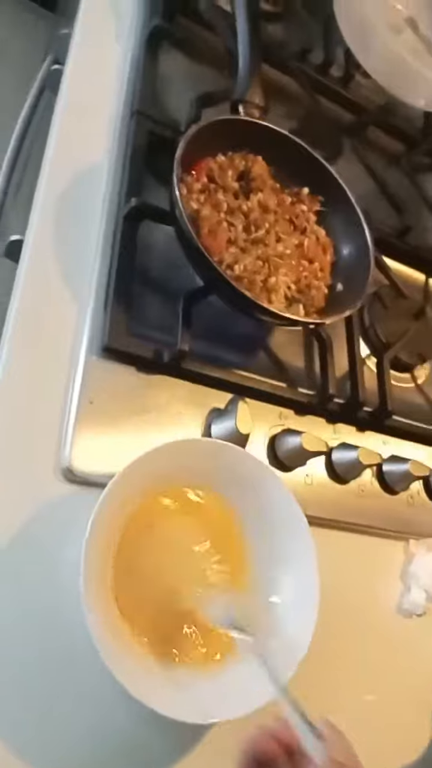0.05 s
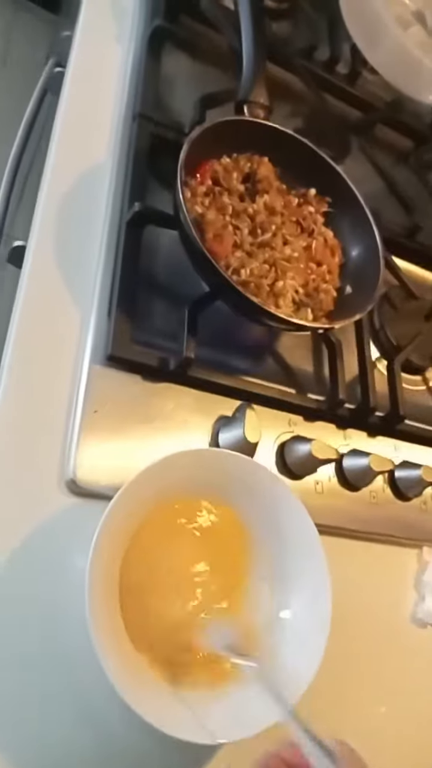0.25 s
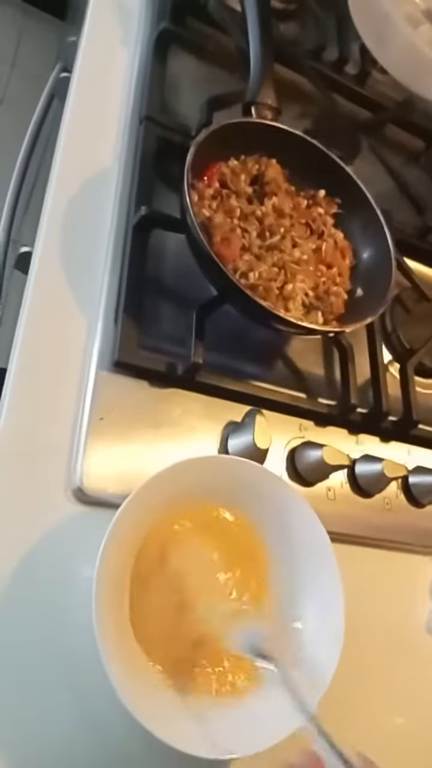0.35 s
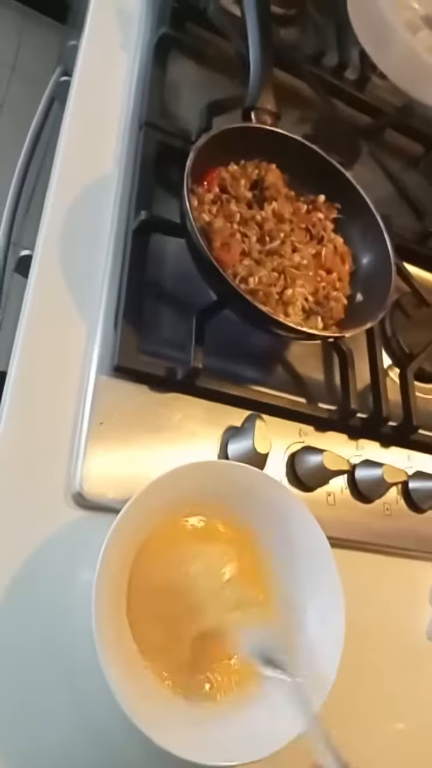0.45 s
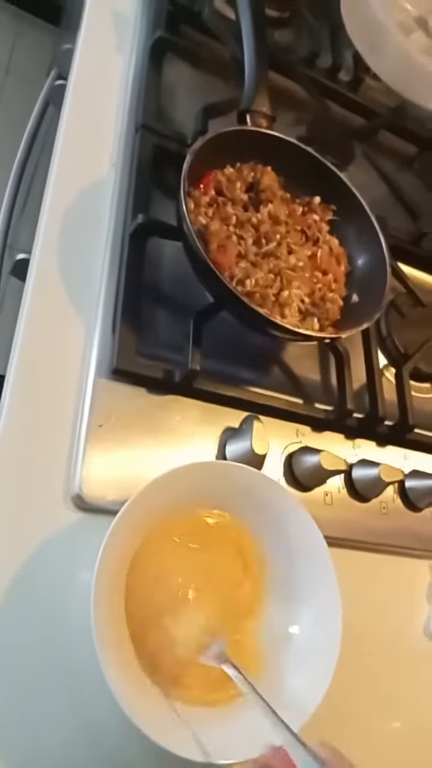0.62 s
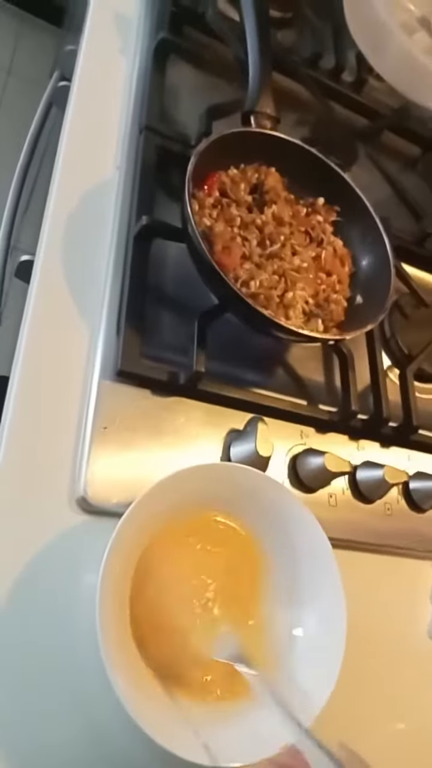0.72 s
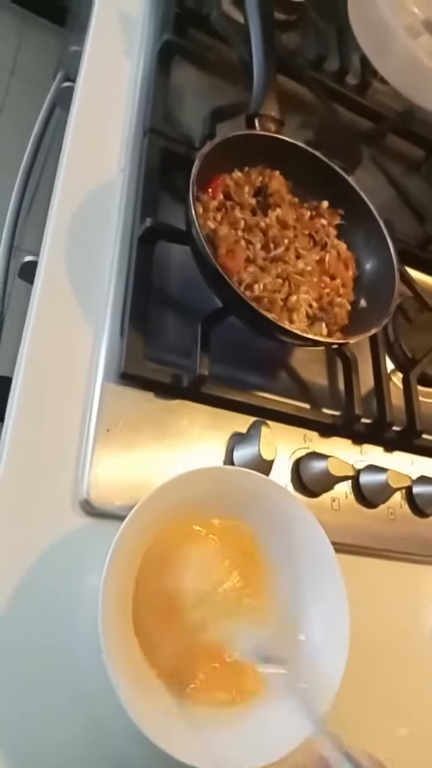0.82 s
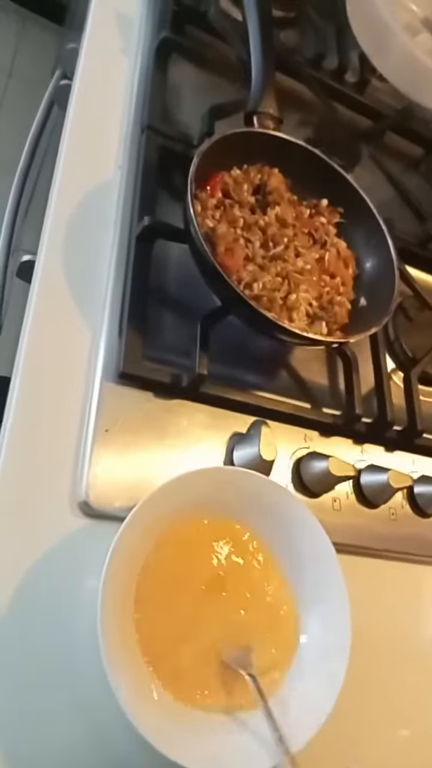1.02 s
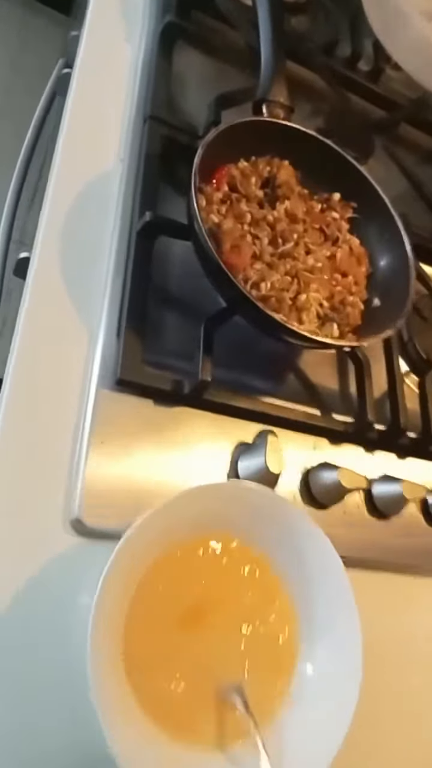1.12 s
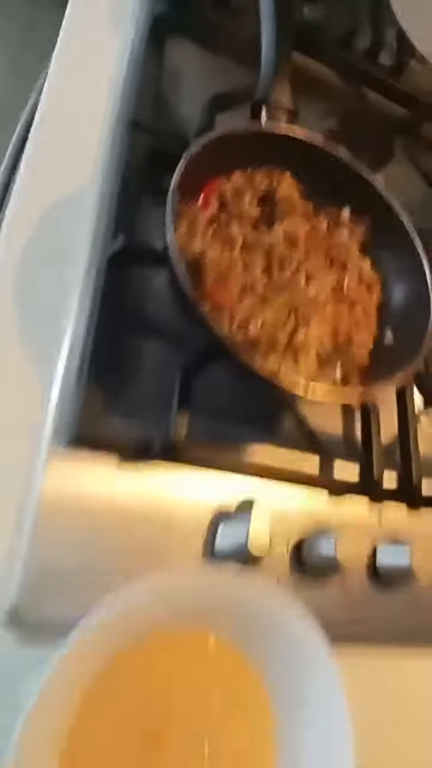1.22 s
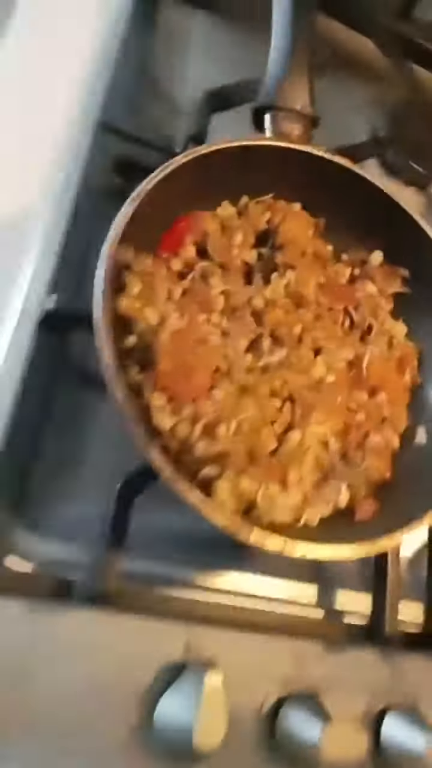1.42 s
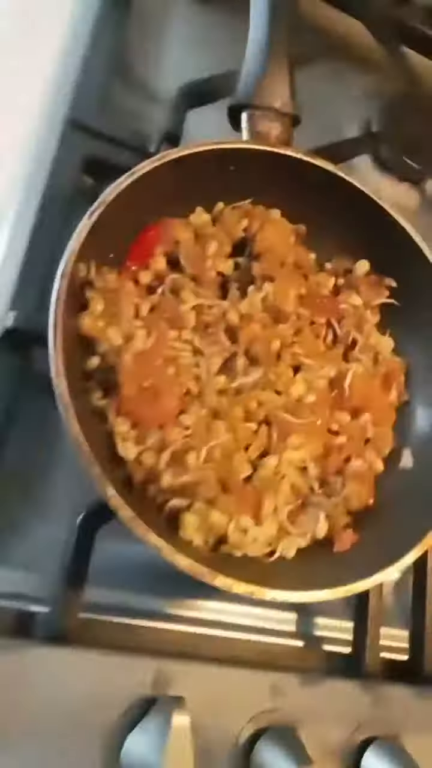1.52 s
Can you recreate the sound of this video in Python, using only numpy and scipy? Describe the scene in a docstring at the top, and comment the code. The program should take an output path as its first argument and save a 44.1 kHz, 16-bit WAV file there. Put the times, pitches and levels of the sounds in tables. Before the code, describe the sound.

Rapid fork clicks and wet sloshing of beaten eggs, ending in one bright clink.

```python
"""Beating eggs in a small kitchen

Close up, a fork beats eggs in a hand-held ceramic bowl, about ten strokes a second. Each stroke clicks
on the egg-damped wall and thumps the bowl, and the lifted egg sloshes back. Then the fork is dropped
against the rim and clinks. A frying pan sizzles faintly behind. One microphone, mono."""
import sys
import numpy as np
from scipy import signal
from scipy.fft import rfft, irfft
from scipy.io import wavfile

SR = 44100
rng = np.random.default_rng(int(sys.argv[2]) if len(sys.argv) > 2 else 0)


def to_wav(sig):
    """Store sig (one row per channel, or 1-D mono) as 16-bit WAV at the path in sys.argv[1].

    Samples outside -1..1 are clipped; the rate is SR.
    """
    pcm = np.clip(np.atleast_2d(sig), -1, 1) * 32767
    pcm = np.round(pcm).astype(np.int16)
    wavfile.write(sys.argv[1], SR, pcm.T)  # frames by channels


N = 68355
t = np.arange(N) / SR
age = t[:SR // 3]  # seconds since the start of one short sound

# low background of the kitchen: freq_hz, gain_db
ROOM_TONE_SPECTRUM = [(25, -30), (60, -2.5), (120, 1), (200, -13), (320, -8), (600, -19), (1200, -22.5),
                      (3000, -67)]
# frying hiss: freq_hz, gain_db
SIZZLE_SPECTRUM = [(1000, -11), (2100, -1), (3000, -5.5), (4300, -5), (7500, -20), (9800, -15.5),
                   (12800, -21.5), (13400, -57)]
# a soft knock, then a few faint ticks over the sizzle: start_s, level_db, pitch_hz
KNOCK_AND_TICKS = [(1.2483, -41.5, 1620), (1.2935, -48.5, 3600), (1.3522, -49.5, 4440), (1.424, -50, 4300)]
# churning egg: freq_hz, gain_db
SWIRL_SPECTRUM = [(30, -37), (115, 12.5), (220, -2), (700, -1), (1100, -11), (1700, -30), (3000, -27),
                  (7000, -26), (9800, -14.5), (13400, -40)]
# egg falling back: start_s, length_s, level_db
EGG_SLOSHES = [(.008, .025, -41.5), (0.103, .022, -32), (0.202, .036, -25.5), (0.293, .018, -32),
               (0.396, .025, -47), (0.485, 0.018, -39.5), (0.594, 0.013, -40.5), (.694, .026, -31.5),
               (0.786, 0.037, -31.5), (0.88, 0.029, -28), (0.984, 0.035, -44.5)]
# its wet splash: freq_hz, gain_db
SPLASH_SPECTRUM = [(100, -21), (400, -12), (700, 9), (1100, -7), (1700, 0), (2800, -31.5), (5000, -25),
                   (7500, -30), (9600, -23.5), (13000, -46)]
# fine droplets: freq_hz, gain_db
SPRAY_SPECTRUM = [(800, 2), (2200, 1.5), (4500, 6), (7300, -5.5), (9700, -1), (13500, -9)]
# tines rubbing the glaze: start_s, length_s, level_db, pitch_hz
GLAZE_RUBS = [(.177, 0.023, -32, 1795), (0.539, 0.032, -41.5, 9900), (0.746, 0.059, -41, 9360)]
# fork bouncing on the rim: start_s, ring_db, clatter_db
RIM_BOUNCES = [(1.1175, -11, -27), (1.1226, -10.5, -18), (1.1375, -50, -26), (1.167, -31.5, -32),
               (1.1800, -52, -31.5)]
# bare rim and fork: pitch_hz, gain_db, t60_s
BARE_RIM_MODES = [(770, -12, .13), (1800, -12, .06), (3178, -6, .08), (3232, 1, .125), (3303, -1, .055),
                  (3421, -6, .045), (3544, -9, .045), (4560, -11, .04), (4908, -8, .055), (4967, -6, .13),
                  (6843, -12, .08), (6935, -12, .06), (9372, -11, .06), (11542, -16, .10)]
# rattle of the dropped fork: freq_hz, gain_db
CLATTER_SPECTRUM = [(60, -1.5), (130, 3), (250, -3.5), (700, 3), (1200, 0.5), (2000, 3), (2600, -8),
                    (4700, -1.5), (5900, -27), (7800, -13), (9200, 2), (10600, -11), (12500, -7),
                    (14000, -47)]
# boom of the jolted bowl and the room: freq_hz, gain_db
BOOM_SPECTRUM = [(50, -18), (130, -8), (400, 5.5), (720, 9), (1300, -18), (3000, -28)]
# the beating: start_s, knock_db, knock_hz, click_db, thump_db, scrape_s, clack_db
FORK_STROKES = [(-.005, -32, 1820, -36, -38.5, 0.0082, -62), (.0855, -32.5, 1626, -32, -34.5, 0.0036, -66),
                (.1880, -34.5, 1687, -30, -33.5, 0.0017, -53),
                (0.2826, -23.5, 1610, -28.5, -33, 0.0016, -69),
                (.3770, -26.5, 1630, -30, -30.5, 0.001, -45),
                (0.4739, -28.5, 1824, -31, -31, 0.0036, -29.5),
                (0.5758, -31, 2053, -25.5, -29, 0.0057, -45),
                (.6740, -30.5, 1590, -26.5, -33.5, 0.007, -31.5),
                (0.7696, -32, 2107, -31.5, -31.5, 0.0096, -60),
                (0.864, -35, 1497, -31.5, -31, 0.011, -42.5), (.9630, -21, 1923, -21.5, -24.5, 0.0013, -68),
                (1.046, -33.5, 1564, -47, -40.5, 0.006, -60)]
# contact noise of the tines: freq_hz, gain_db
CLICK_SPECTRUM = [(40, -4), (300, 2.5), (600, 0.5), (1200, -0.5), (2000, 10), (3200, -7), (4700, -1.5),
                  (7200, -9), (9600, -0.5), (10800, -8), (14000, -11.5)]
# ringing tines: pitch_hz, gain_db, t60_s
FORK_MODES = [(4170, -5, .03), (4690, 0, .035), (5750, -4, .03), (8020, -10, .025), (9600, -3, .02),
              (11540, -12, .04), (13720, -3, .025)]
# egg-damped wall: ratio_to_knock_pitch, gain_db, t60_s
WALL_MODES = [(.88, -6, .025), (1, 0, .03), (1.11, -3, .022), (1.27, -6, .022)]
# higher ring of the wall when the fork lands hard: pitch_hz, gain_db, t60_s
HARD_HIT_MODES = [(2438, 7, 0.026), (2854, 17, 0.013), (3176, 6, 0.017)]
# the whole bowl and its load: pitch_hz, gain_db, t60_s
BOWL_MODES = [(102.6, -0.5, 0.067), (150.6, -4.5, 0.091), (316.7, 9, 0.025), (424.7, 0.5, 0.054)]


def amp(db):
    """Decibels to gain."""
    return 10 ** (np.asarray(db) / 20)


def level(x, db):
    """Set the rms level of a steady sound."""
    return x * amp(db) / np.std(x)


def strength(x, db, window_s=.005):
    """Set the level of a short sound, counted as its energy spread over window_s."""
    return x * amp(db) * np.sqrt(window_s * SR / np.sum(x ** 2))


def fade(t60):
    """Exponential decay, 60 dB in t60 seconds."""
    return np.exp(-np.log(1000) * age / t60)


def swell(attack_s, length_s):
    """Linear rise under a bell-shaped fall."""
    return np.minimum(age / attack_s, 1) * np.exp(-(age / length_s) ** 2)


def add(out, at, x):
    """Mix x into out from a given time."""
    i = int(round(at * SR))
    x, i = x[max(-i, 0):], max(i, 0)
    out[i:i + len(x)] += x[:len(out) - i]


def colour(x, spectrum, size=4096):
    """Minimum-phase filter through (freq_hz, gain_db) points."""
    hz, db = np.array(spectrum).T
    freqs = np.maximum(np.fft.rfftfreq(size, 1 / SR), 1)
    gain = amp(np.interp(np.log(freqs), np.log(hz), db))
    cepstrum = irfft(np.log(gain))
    cepstrum[1:size // 2] *= 2
    cepstrum[size // 2 + 1:] = 0
    return signal.fftconvolve(x, irfft(np.exp(rfft(cepstrum))))[:len(x)]


def band(x, hz, width):
    """One resonance; the width is a share of its pitch."""
    return signal.lfilter(*signal.iirpeak(hz, 1 / width, SR), x)


def ring(modes, scale=1, attack_s=.0005, scatter_db=1):
    """Decaying modes, neighbours swinging opposite ways; each blow excites them a little differently."""
    out = np.zeros(len(age))
    for k, (hz, db, t60) in enumerate(modes):
        gain = (-1) ** k * amp(db + scatter_db * rng.standard_normal())
        out += gain * fade(t60) * np.sin(2 * np.pi * hz * scale * age)
    return out * (1 - np.exp(-age / attack_s))


def grit(size, spread_db):
    """Dense tiny clicks of uneven size."""
    return rng.standard_normal(size) * amp(spread_db * np.minimum(rng.exponential(size=size), 3.5))


def room_tone():
    """The kitchen's steady low rumble, about as faint as the frying hiss."""
    return level(colour(rng.standard_normal(N), ROOM_TONE_SPECTRUM), -56.5)


def reflections(direct, wet_db=-8.5, t60_s=.25, treble_t60_s=.22, treble_db=-5.5, gap_s=.0051):
    """Add the dense echoes of nearby walls; the treble dies sooner."""
    noise = irfft(np.exp(2j * np.pi * rng.random(len(age) // 2 + 1)), len(age))  # flat spectrum
    low = signal.sosfiltfilt(signal.butter(2, 2500, fs=SR, output="sos"), noise)
    treble = amp(treble_db) * (noise - low)
    tail = (low * fade(t60_s) + treble * fade(treble_t60_s)) * (age > gap_s)
    tail /= np.linalg.norm(fade(t60_s)) * np.std(noise)
    return direct + amp(wet_db) * signal.fftconvolve(direct, tail)[:N]


def frying_pan(crackles_per_s=250):
    """Faint frying behind the bowl: an even hiss and fine crackle."""
    hiss = colour(rng.standard_normal(N), SIZZLE_SPECTRUM)
    pops = rng.standard_normal(N) * (rng.random(N) < crackles_per_s / SR)
    return level(hiss, -55.5) + level(colour(pops, SIZZLE_SPECTRUM), -59.5)


def knock_and_ticks():
    """A soft knock, then a few faint ticks over the sizzle."""
    out = np.zeros(N)
    for at, db, hz in KNOCK_AND_TICKS:
        burst = rng.standard_normal(len(age)) * fade(.0087)
        add(out, at, strength(band(burst, hz, width=.2), db))
    return out


def egg_swirl(stop_s=1.104, settle_s=.029):
    """The egg keeps churning between strokes and settles when the fork stops."""
    moving = np.clip(1 - (t - stop_s) / settle_s, 0, 1)
    return moving * level(colour(grit(N, spread_db=3.5), SWIRL_SPECTRUM), -53)


def bubbles(length_s, per_s=1200, centre_hz=835, log_spread=.432, cycles=17, rise=.19, most=80):
    """A cluster of bubbles, each ringing briefly as its pitch rises."""
    out = np.zeros(len(age))
    draws = rng.random((most, 3))
    pitches = centre_hz * np.exp(log_spread * rng.standard_normal(most))
    count = max(int(per_s * length_s), 1)
    for (when, size, polarity), hz in zip(draws[:count], pitches):
        life_s = cycles / hz
        turns = np.cumsum(hz * (1 + rise * np.minimum(age / life_s, 1))) / SR
        gain = (.64 + size) * np.sign(polarity - .5)
        add(out, when * length_s, gain * fade(life_s) * np.sin(2 * np.pi * turns))
    return out


def egg_sloshes():
    """Lifted egg falls back with bubbles and a wet splash."""
    out = np.zeros(N)
    for at, length_s, db in EGG_SLOSHES:
        add(out, at, strength(bubbles(length_s), db - 2.5))
        splash = grit(len(age), spread_db=4.5) * swell(.001, length_s)
        add(out, at, strength(colour(splash, SPLASH_SPECTRUM), db + 1.5))
    return out


def droplets(length_s=.021):
    """The fine spray that follows a click."""
    return colour(grit(len(age), spread_db=-1.5) * np.exp(-(age / length_s) ** 2), SPRAY_SPECTRUM)


def tine_swish():
    """The tines swish through the egg, swelling up to the click."""
    dying_noise = rng.standard_normal(len(age)) * fade(.013)
    return colour(dying_noise[::-1], CLICK_SPECTRUM)


def fork_rubs(width=.18):
    """Now and then the fork brushes the wall on its way in."""
    out = np.zeros(N)
    for at, length_s, db, hz in GLAZE_RUBS:
        friction = rng.standard_normal(len(age)) * swell(.0016, length_s)
        add(out, at, strength(band(band(friction, hz, width), hz, width), db))
    return out


def fork_drop():
    """The released fork bounces on the bare rim, which rings freely over a dull boom."""
    out = np.zeros(N)
    for at, ring_db, clatter_db in RIM_BOUNCES:
        add(out, at, strength(ring(BARE_RIM_MODES, scatter_db=3), ring_db))
        clatter = grit(len(age), spread_db=.5) * fade(.075)
        add(out, at, strength(colour(clatter, CLATTER_SPECTRUM), clatter_db))
        boom = rng.standard_normal(len(age)) * fade(.36)
        add(out, at, strength(colour(boom, BOOM_SPECTRUM), clatter_db - 9.5))
    return out


def tine_click(scrape_s, t60_s=.032):
    """The tines skid on the wall: grit builds for half the scrape, then dies away."""
    rise = np.minimum(age / (.5 * scrape_s), 1)
    fall = np.minimum(fade(t60_s) / fade(t60_s)[int(scrape_s * SR / 2)], 1)
    return colour(grit(len(age), spread_db=-.5) * rise * fall, CLICK_SPECTRUM)


def fork_strokes(tine_detune=.008, bowl_detune=.034, thump_lag_s=.0015, spray_lag_s=.012):
    """In the foreground, each stroke swishes in, clicks, rings tines, wall and bowl, and throws spray."""
    out = np.zeros(N)
    for at, knock_db, knock_hz, click_db, thump_db, scrape_s, clack_db in FORK_STROKES:
        add(out, at, strength(tine_click(scrape_s), click_db))
        tine_tuning = 1 + tine_detune * rng.standard_normal()
        tines = ring(FORK_MODES, tine_tuning, attack_s=.083 * scrape_s, scatter_db=2.5)
        add(out, at, strength(tines, click_db - 8.5))
        knock = ring(WALL_MODES, knock_hz, attack_s=scrape_s, scatter_db=2.5)
        add(out, at, strength(knock, knock_db))
        add(out, at, strength(ring(HARD_HIT_MODES, attack_s=scrape_s), clack_db))
        thump = ring(BOWL_MODES, 1 + bowl_detune * rng.standard_normal(), attack_s=.0035)
        add(out, at + thump_lag_s, strength(thump, thump_db))
        add(out, at + spray_lag_s, strength(droplets(), click_db - 11.5))
        add(out, at - len(age) / SR, strength(tine_swish(), click_db - 14.5))
    return out


def scene():
    """Bowl in front, pan behind, the kitchen around them; both channels alike."""
    direct = fork_strokes() + fork_rubs() + egg_sloshes() + fork_drop() + frying_pan() + knock_and_ticks()
    mono = reflections(direct) + egg_swirl() + room_tone()
    return np.array([mono, mono])


def record(dry, top_hz=14050):
    """The recorder cuts the top steeply."""
    return signal.sosfilt(signal.ellip(10, .2, 70, top_hz, fs=SR, output="sos"), dry)


dry = scene()
out = record(dry)
to_wav(out)
```